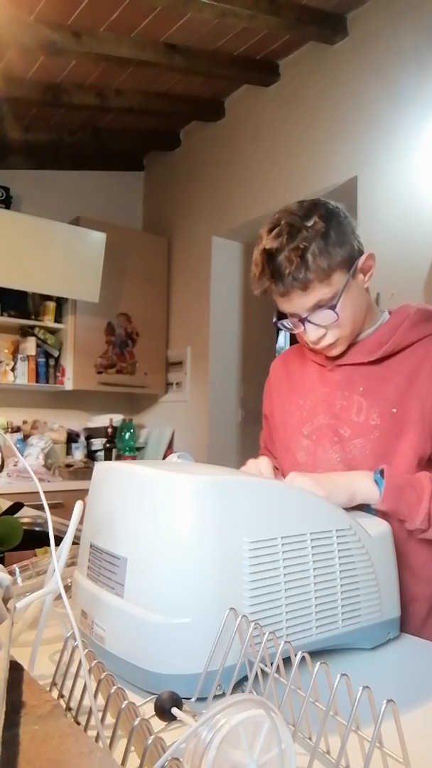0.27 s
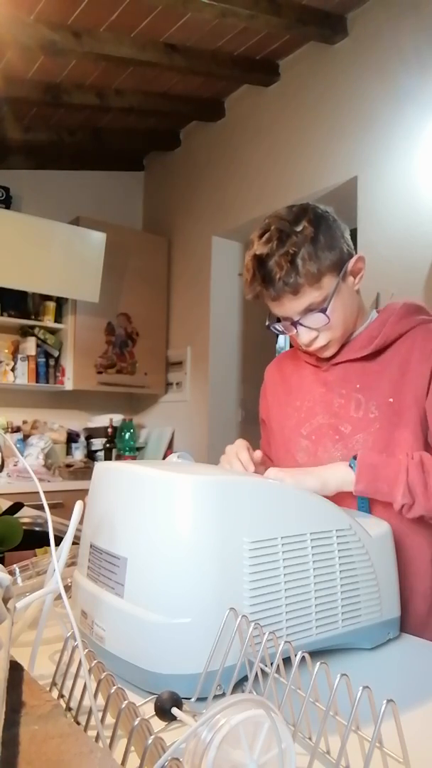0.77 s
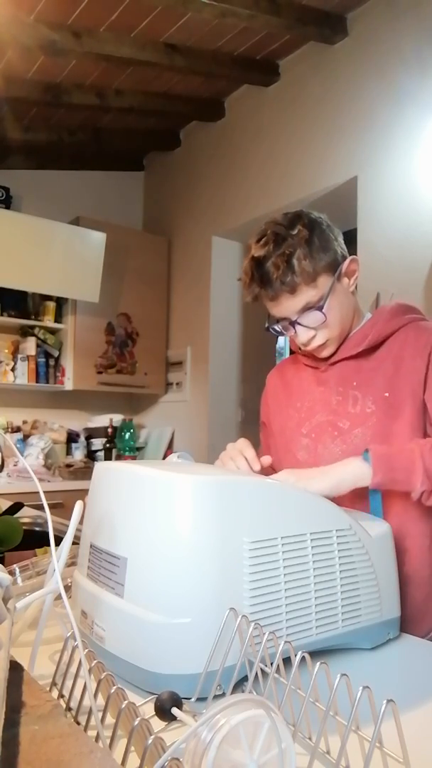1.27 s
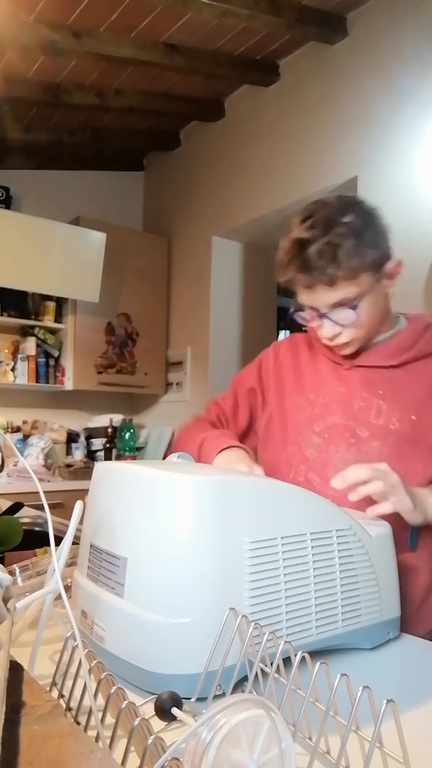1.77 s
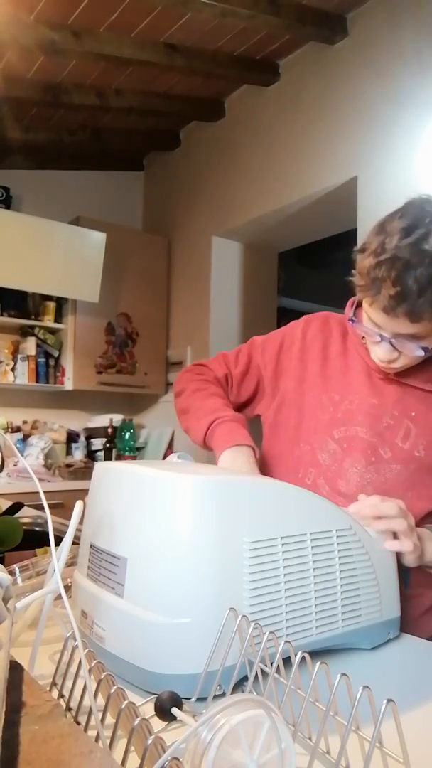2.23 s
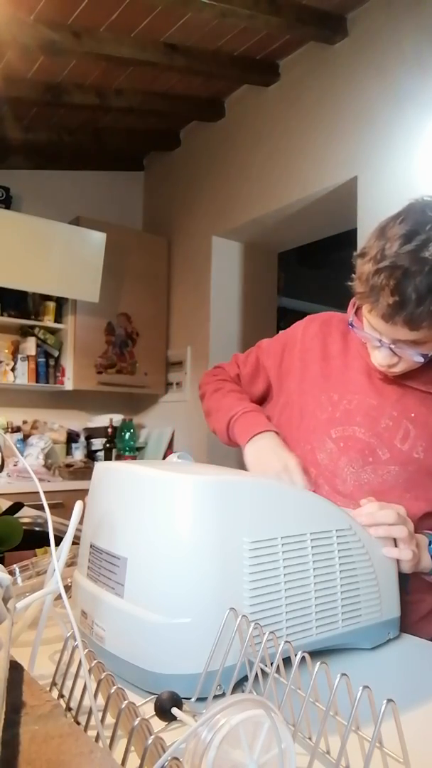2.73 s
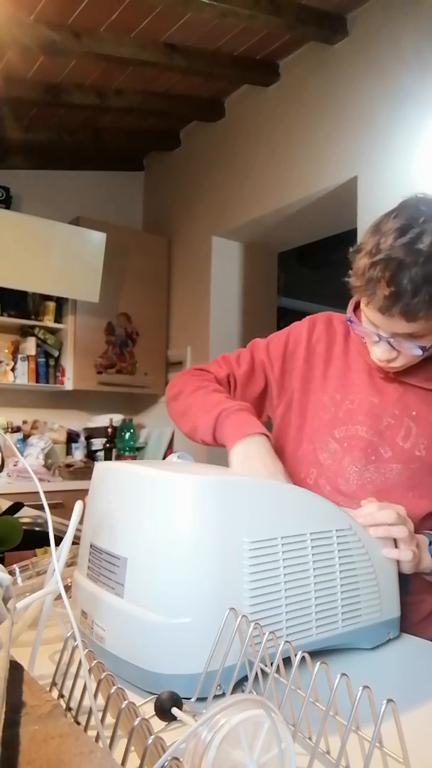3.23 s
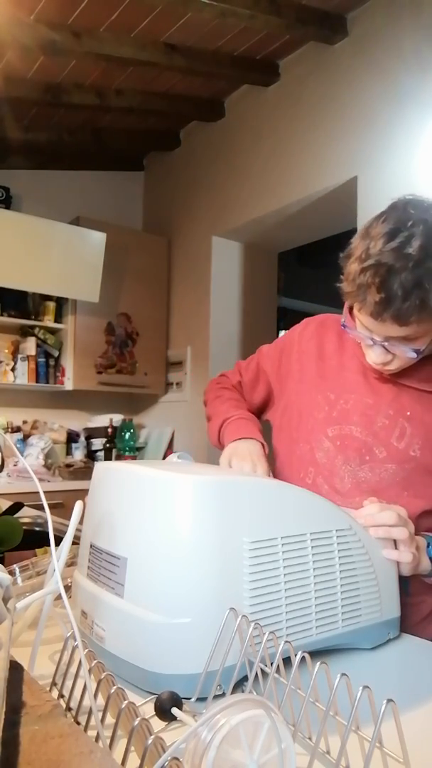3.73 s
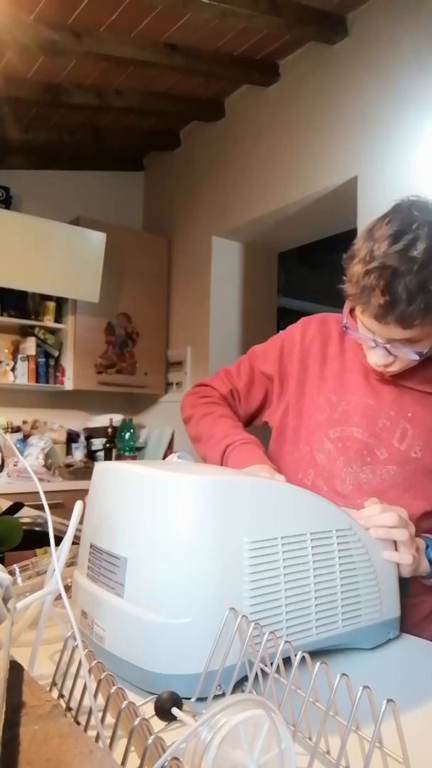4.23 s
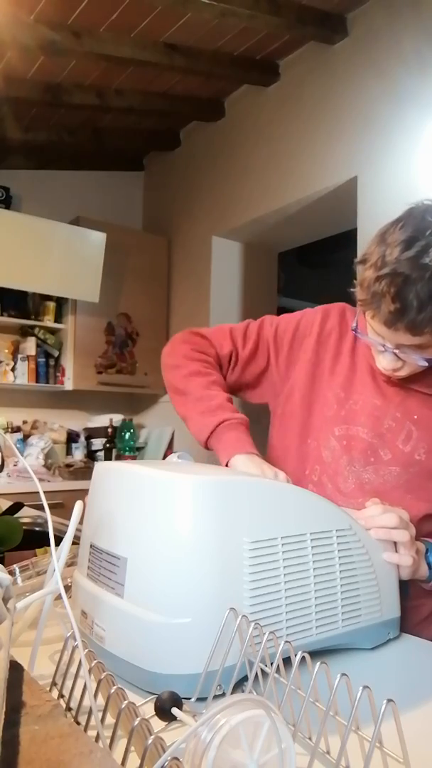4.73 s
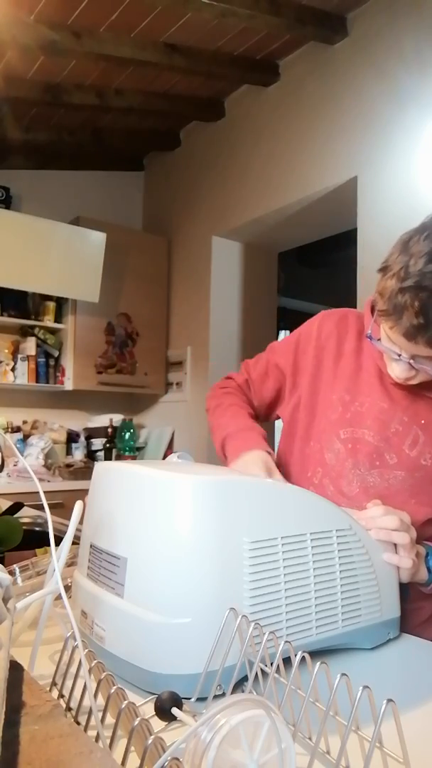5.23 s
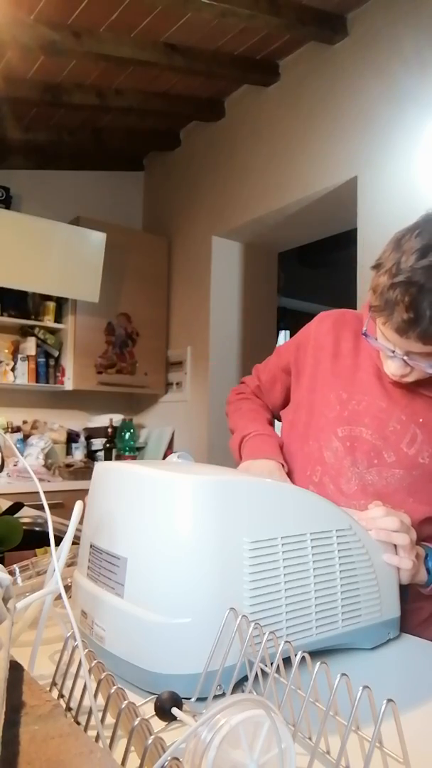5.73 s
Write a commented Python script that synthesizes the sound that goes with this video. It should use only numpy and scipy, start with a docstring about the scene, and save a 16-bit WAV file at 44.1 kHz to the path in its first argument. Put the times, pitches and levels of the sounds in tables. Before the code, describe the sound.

Hard plastic parts are handled on a hollow ice cream machine in a quiet kitchen. A small knock opens the sound, with a light fingertip rub at 0.1 s, then the loudest clack at 0.18 s, hollow and ringing briefly with a low housing thump. Weak ticks follow to 0.6 s, then near quiet until 1.9 s. A tight group of firm knocks falls at 1.95-2.1 s. Fingers rub around 2.5-2.9 s, with single clicks at 2.7 and 3.0 s. From 3.1 to 3.5 s clacks crowd together as a part is pressed home, strongest at 3.3 and 3.46 s. Soft dull taps and faint rumbling shoves come at 4.1-4.45 s, a click at 5.0 s, then a brighter flurry at 5.4-5.75 s with a low shove at the end. Short room reverberation surrounds everything; the low house murmur is very faint, with slight hiss rising after 4 s.

```python
"""Clicks, knocks and rubs of hard plastic: parts are pressed, slid and snapped into an ice cream maker.
The place is a kitchen counter; every blow rings the hollow housing, its walls and the rim of the part.
Fingers and parts rub in between as shaped noise, and shoves make the housing rumble.
The hands work behind the machine, so the treble reaches the microphone mostly by way of the room.
Under it lie the low murmur of the house and a faint hiss that comes up in the last seconds."""
import sys
import numpy as np
from scipy import signal
from scipy.fft import rfft, irfft, next_fast_len
from scipy.io import wavfile
from scipy.ndimage import uniform_filter1d

SR = 44100
rng = np.random.default_rng(int(sys.argv[2]) if len(sys.argv) > 2 else 0)


def master(y):
    """Save y as 16-bit WAV."""
    cut = np.clip(np.atleast_2d(y).T, -1, 1)
    pcm = np.round(cut * 32767)  # scale
    wavfile.write(sys.argv[1], SR, pcm.astype(np.int16))


N = 264467
TIME = np.arange(N) / SR

# Spectrum of the room's murmur: (frequency [Hz], relative density [dB])
MURMUR_SPECTRUM = [(15, -38), (27, -34), (35, -0.5), (49, 3), (61, -30), (88, -2), (120, -9.5), (260, -4.5),
                   (400, -12.5), (700, -20), (1200, -25), (2500, -34.5), (3900, -36.5), (5200, -24),
                   (7000, -32), (8800, -41.5), (15500, -36)]
MURMUR_DB, MURMUR_PAN_DB = -58.5, -2  # pan: left minus right
# Spectrum of the faint hiss: (frequency [Hz], relative level [dB])
HISS_SPECTRUM = [(500, 4), (1500, -7.5), (3000, 4), (4000, -8), (5200, -2.5), (7000, -1.5), (8500, -19.5),
                 (15000, -21)]
# Course of the hiss: (time [s], level [dB])
HISS_LEVEL = [(0, -69.5), (3.7, -66), (3.95, -67.5), (4.5, -61), (5.5, -63.5), (6, -66)]
# Reverberation of the kitchen: (frequency [Hz], level [dB], t60 [s])
KITCHEN = [(121, -2, 0.48), (289, -5.5, 0.36), (900, -2.5, 0.37), (2230, -3, 0.36), (5900, 1, 0.37),
           (13400, -5.5, 0.21)]

# Side on which the hands work, as the microphone hears it: (time [s], left minus right level [dB])
HANDS_SIDE = [(0, -0.5), (.2, -2), (.6, -2), (1.9, -1.5), (3.45, -2), (3.8, 3.5), (6, 3.5)]
HOUSING_PAN_DB = 1  # the housing sounds a little left of the hands

# Spectrum of the rumbling housing: (frequency [Hz], relative level [dB])
RUMBLE_SPECTRUM = [(40, -5), (80, -3), (120, 3.5), (170, -1.5), (260, 1), (400, -11), (650, -16),
                   (1400, -26.5), (2500, -42.5)]
# Shoves that make it rumble: (time of greatest strength [s], length [s], level before rumble trim [dB])
SHOVES = [(0, 0.04, -29.5), (0.167, 0.23, -42.5), (0.846, 0.23, -54), (2.68, 0.44, -53),
          (2.956, 0.16, -52.5), (3.845, .2, -51), (4.168, 0.38, -50), (4.431, 0.36, -47), (4.824, 0.4, -63),
          (5.774, 0.15, -37.5)]
RESTING_DB = -59.5  # before rumble trim, under hands that only hold the machine

# Strokes of fingers and parts over the plastic:
# (start time [s], length [s], level before rub trim [dB], share of light fingertip hiss [0-1])
RUBS = [(0, 0.13, -63, 0.5), (.11, 0.13, -40.5, 0.92), (0.405, 0.1, -56, 0.1), (1.214, 0.35, -59.5, 0.5),
        (1.883, 0.082, -56.5, 0.9), (2.262, 0.1, -54.5, 0.4), (2.535, 0.3, -45.5, 0.68),
        (2.802, 0.16, -43.5, 0.94), (3.2, 0.2, -47, .1), (4.396, 0.07, -50.5, .02),
        (4.95, 0.072, -48.5, 0.75), (5.182, 0.15, -57.5, 0.44)]
RUB_PEAK = 0.62  # share of a stroke spent speeding up
# Spectrum of fingertip hiss: (frequency [Hz], relative level [dB])
FINGERTIPS = [(300, -2.5), (1200, 4), (2800, -19.5), (4000, -10), (6300, -0.5), (9000, -4), (12000, -6.5),
              (15000, 1.5)]
# A contact skids on briefly: level against its edge tick before rub trim, length, share of light hiss 0-1
SKID_DB, SKID_S, SKID_LIGHT = -3, 0.047, 0.36

# Crowded small modes of the plastic: (frequency [Hz], relative level [dB])
PLASTIC = [(70, -13.5), (150, -2), (230, 1), (450, -1.5), (680, -3), (950, 11), (1500, 0), (1900, 0.5),
           (2500, 2), (3300, -7.5), (3900, -10.5), (5200, -7.5), (7100, -5.5), (8400, -16.5),
           (12500, -20.5), (15200, -22)]
# Strong modes of the machine, before scatter and detuning:
# (frequency [Hz], relative level [dB], t60 before joint friction [s])
MODES_OF_MACHINE = [(117, -20.5, .2), (152.2, 0.5, 0.19), (209, -10, 0.19), (246, 5.5, 0.12),
                    (304.3, -2, 0.07), (379.2, 1.5, 0.23), (449, -12, 0.091), (510.2, -2, 0.15),
                    (530, -17.5, 0.15), (660, -13.5, 0.4), (694.4, -8.5, 0.18), (890, 6.5, 0.041),
                    (1000, 1.5, 0.042), (1189, 5, 0.021), (1420, -6.5, 0.14), (1500, -6.5, 0.12),
                    (1572, -2.5, 0.051), (2014, -18, 0.034), (2245, -5.5, 0.11), (2260, -3, 0.17),
                    (2421, -1.5, 0.15), (2880, -15, 0.083), (3270, 2.5, 0.052), (5330, 2, 0.11),
                    (5100, -3, 0.19), (5630, -3.5, 0.057), (5920, 0.5, 0.11), (6900, -6, 0.19),
                    (7040, -2.5, 0.22)]
# Housing, walls, rim, edges:
# (trim [dB], dense ring t60 at usual strength [s], dense ring against modes [dB], build-up [s])
PARTS = [(-0.5, 0.15, 1, 0.0076), (-1.5, 0.029, -1.5, 0.0014), (-0.5, 0.071, 5, 0.0024),
         (-0.5, 0.11, 6, 0.0007)]
# Limits of the ranges of housing, walls, rim and edges: (frequency [Hz])
EDGES_HZ = [70, 620, 1800, 4200, 17000]
# Blows of part on machine, levels before the trims of the parts: (time [s], strength [dB],
# weight behind it [dB re strength], hardness [dB re strength], clack pitch [Hz])
BLOWS = [(0.003, -33, -4, -15, 1500), (0.022, -37, -4, -23, 1910), (0.119, -44.5, 7, -4.5, 3200),
         (0.181, -23, -8, -10.5, 2580), (0.183, -15.5, -5.5, -18, 830), (0.317, -43, 0, -3, 2570),
         (0.489, -40, -0.5, -34, 940), (0.564, -45, -4.5, -21.5, 1840), (0.826, -66.5, 14, -3, 1490),
         (0.944, -53.5, 6.5, -15, 1200), (1.904, -56, 16, -2, 1220), (1.936, -43.5, 0, -27, 1020),
         (1.965, -33, -7, -22, 1210), (1.977, -27.5, -6.5, -3.5, 1280), (2.066, -30.5, -6.5, -15, 1370),
         (2.368, -53, -8, -9, 1210), (2.703, -36, -4.5, -8.5, 1200), (2.989, -32, -12.5, -9, 1200),
         (3.057, -43, 6, -30, 1190), (3.134, -54.5, 4.5, 10, 2500), (3.183, -45.5, -2, -24, 1250),
         (3.248, -46, 1, -34, 1240), (3.296, -26.5, -11, -16.5, 1400), (3.31, -37.5, 3.5, -11, 1430),
         (3.327, -41.5, 3.5, 4, 1200), (3.406, -33.5, -4, -12.5, 1460), (3.433, -38.5, 2, -1, 1530),
         (3.459, -24, -3.5, -14, 1450), (3.743, -46.5, 4.5, -16, 1990), (3.845, -56.5, -14, 11, 1420),
         (4.119, -45.5, -22, -35, 1090), (4.157, -46.5, 6.5, -37, 965), (4.196, -41.5, 0.5, -30, 1900),
         (4.228, -39.5, -3, -21, 1920), (4.367, -47, -11, -16, 980), (4.386, -41.5, -2, -25, 1550),
         (4.429, -45.5, 3, -9, 1450), (4.903, -52.5, -2, -5, 1420), (4.993, -34.5, -3, -18.5, 1410),
         (5.367, -41.5, 0, -20.5, 1490), (5.44, -37.5, -3, -16, 2400), (5.643, -41, -1.5, -25.5, 1710),
         (5.682, -31.5, -6.5, -6, 2560), (5.689, -32, 6, -20, 2430), (5.719, -35.5, -0.5, -1.5, 1500)]
# The housing thuds low, and about an octave higher while the part is being pressed home
THUD_HZ, SEATING_THUD_HZ = 245.4, 515
SEATING_START_S, SEATING_END_S = 3.28, 3.5
# The rim takes a share of the contact's hardness, and rings more when the contact is high in pitch
RIM_DB, RIM_HARD_SHARE, RIM_DB_PER_OCTAVE, USUAL_CLACK_HZ = -7, 0.32, 10.5, 1400
# Friction in the joints stops big swings of housing and walls sooner: extra fade's t60 at this strength
FRICTION_T60_S, FRICTION_AT_DB = 0.2, -13

TOP_HZ = 15900  # upper limit of the phone's microphone


def undb(db):
    """Decibels to gain."""
    return 10 ** (np.asarray(db) / 20)


def unit(x):
    """Scale to rms 1."""
    return x / np.sqrt(np.mean(x ** 2))


def freqs(size):
    """Frequencies [Hz] of the spectrum of size samples, kept above zero for logarithms."""
    return np.maximum(np.arange(size // 2 + 1) * SR / size, 1)


def colour(x, points):
    """Shape a sound by (Hz, dB) points, joined on a logarithmic frequency axis."""
    hz, db = np.transpose(points)
    length = x.shape[-1]
    size = next_fast_len(length, True)
    gain = undb(np.interp(np.log(freqs(size)), np.log(hz), db))
    return irfft(rfft(x, size) * gain, size)[..., :length]


def band(x, lo_hz, hi_hz, order=4):
    """Causal band-pass."""
    limits = [lo_hz, min(hi_hz, SR / 2 - 1000)]
    return signal.sosfilt(signal.butter(order, limits, "band", fs=SR, output="sos"), x)


def diffuse(size, alike_hz=720, bass_alike=0.98):
    """Noise from all sides at two microphone ports: the bass is shared, the treble unrelated."""
    padded = next_fast_len(size, True)
    alike = min(bass_alike, 1) * np.exp(-(freqs(padded) / alike_hz) ** 4)
    noise = rfft(rng.standard_normal((2, padded)))
    mid, side = noise * np.sqrt([1 + alike, 1 - alike])
    return irfft(np.array([mid + side, mid - side]), padded)[:, :size] / np.sqrt(2)


def fade(t, t60):
    """Exponential decay, 60 dB down after t60."""
    return np.exp(-np.log(1000) * t / t60)


def lean(pan_db):
    """Left and right gains for a level difference."""
    return undb(np.array([[1], [-1]]) * pan_db / 2)


def hands_db(s):
    """Left minus right level of the place where the hands work."""
    return np.interp(s, *np.transpose(HANDS_SIDE))


def stroke(start, length, peak):
    """Speed of one movement, 0-1: it gathers for the share peak of its length, then comes to rest."""
    turn = start + length * np.clip(peak, .01, .99)
    ramp = np.interp(TIME, [start, turn, start + length], [0, 1, 0])
    return np.sin(np.pi / 2 * ramp)


def room_tone():
    """Low murmur of the house under a smooth hiss, both steady noise shaped in spectrum."""
    murmur = unit(colour(diffuse(N), MURMUR_SPECTRUM)) * undb(MURMUR_DB) * lean(MURMUR_PAN_DB)
    hiss = unit(colour(diffuse(N), HISS_SPECTRUM))
    return murmur + hiss * undb(np.interp(TIME, *np.transpose(HISS_LEVEL)))


def kitchen(dry, first_echo_s=0.0105, build_s=0.00033):
    """Counter, walls and ceiling return a dense tail that is shortest in the high treble."""
    t = TIME[:SR]
    hz, wet_db, t60 = np.transpose(KITCHEN)
    spectrum = rfft(diffuse(len(t)))
    log_bins = np.log(freqs(len(t)))
    onset = 1 - np.exp(-np.maximum(t - first_echo_s, 0) / build_s)
    tail = 0
    # each row of the identity matrix fades one table band into its neighbours
    for share, db, decay in zip(np.eye(len(hz)), wet_db, t60):
        shape = onset * fade(t, decay)
        noise = irfft(spectrum * np.interp(log_bins, np.log(hz), share), len(t))
        tail = tail + undb(db) * noise * shape / np.sqrt(np.sum(shape ** 2))
    return signal.fftconvolve(dry, tail, axes=1)[:, :N]


def rumble(trim_db=-3, swell=2.9):
    """Resting hands shake the hollow housing a little, each shove more."""
    effort = undb(RESTING_DB)
    for s, length, db in SHOVES:
        effort = effort + undb(db) * stroke(s - 0.5 * length, length, 0.42) ** swell
    # the stroke peaks slightly before its middle
    shaking = unit(colour(diffuse(N), RUMBLE_SPECTRUM))
    return shaking * effort * undb(trim_db) * lean(hands_db(TIME) + HOUSING_PAN_DB)


def rubs(grain_db=3.5, trim_db=-5, swell=1.01, rasp_hz=4700, edge_width_hz=170, edge_db=-4, skid_peak=0.073):
    """Surfaces catch and slip in tiny steps: plastic rasps, fingertips hiss."""
    steps = TIME[::100]
    grip = undb(grain_db * np.interp(TIME, steps, rng.standard_normal(len(steps))))
    catches = diffuse(N) * grip
    # the sliding edge sings in its own modes, damped by the contact
    edge = 0
    for hz, db, _ in MODES_OF_MACHINE:
        if hz > EDGES_HZ[-2]:
            edge = edge + undb(db) * band(catches, hz - edge_width_hz / 2, hz + edge_width_hz / 2, order=1)
    scrape = unit(band(colour(catches, PLASTIC), rasp_hz, TOP_HZ, order=1))
    rasp = unit(scrape + undb(edge_db) * unit(edge))
    hiss = unit(colour(diffuse(N) * grip, FINGERTIPS))
    slides = [(*row, RUB_PEAK) for row in RUBS]
    skids = [(s, SKID_S, db + hard_db + SKID_DB, SKID_LIGHT, skid_peak)
             for s, db, _, hard_db, _ in BLOWS]
    rasp_power, hiss_power = 0, 0
    for start, length, db, light, peak in slides + skids:
        power = (undb(db + trim_db) * stroke(start, length, peak) ** swell) ** 2
        light = np.clip(light, 0, 1)
        rasp_power = rasp_power + (1 - light) * power
        hiss_power = hiss_power + light * power
    return lean(hands_db(TIME)) * (np.sqrt(rasp_power) * rasp + np.sqrt(hiss_power) * hiss)


def blow(levels_db, spots_hz, pans_db, spot_db=7, spot_width=0.2, scatter_db=2.5, detune=0.00666,
         port_spread=1.04, chatter=0.068, usual_db=-38):
    """One contact rings strong modes and a crowd of small ones; one stereo sound for each part."""
    t = TIME[:SR // 4]
    hz, db, t60 = np.transpose(MODES_OF_MACHINE)
    bins = freqs(len(t))
    chance = rng.standard_normal((3, len(hz)))
    # the struck spot favours the modes near its thud and clack pitches, and the grip detunes them
    nearness = sum(np.exp(-(np.log(bins / spot) / spot_width) ** 2) for spot in spots_hz)
    favour = undb(spot_db * nearness)
    size = undb(db + scatter_db * chance[0]) * np.interp(hz, bins, favour)
    tuned_hz = hz * (1 + detune * chance[1])
    waves = np.exp(2j * np.pi * tuned_hz[:, None] * t) * fade(t, t60[:, None])
    # short waves reach the two microphone ports out of step
    skew = port_spread * np.minimum(hz / 800, 2) ** 2 * chance[2]
    weights = size * np.exp(1j * np.array([skew, -skew]) / 2)
    crowd = rfft(colour(diffuse(len(t)), PLASTIC)) * favour
    out = []
    for lo_hz, hi_hz, part, level_db, pan_db in zip(EDGES_HZ, EDGES_HZ[1:], PARTS, levels_db, pans_db):
        trim_db, ring_t60, crowd_db, rise_s = part
        own = (hz >= lo_hz) & (hz < hi_hz)
        modes = (weights[:, own] @ waves[own]).imag
        # the harder the blow, the longer loose parts chatter against each other
        clatter = fade(t, ring_t60 * undb(chatter * (level_db - usual_db)))
        dense = irfft(crowd * ((bins >= lo_hz) & (bins < hi_hz)), len(t)) * clatter
        build_up = 1 - np.exp(-t / rise_s)
        ring = lean(pan_db) * (unit(modes) + undb(crowd_db) * unit(dense)) * build_up
        # a level is that of the loudest few milliseconds
        peak = np.sqrt(uniform_filter1d(np.mean(ring ** 2, axis=0), size=256).max())
        out.append(undb(level_db + trim_db) * ring / peak)
    return np.array(out)


def knocks():
    """All the clicks and knocks: weight brings out the housing, hardness the rim and edges."""
    parts = np.zeros((len(PARTS), 2, N + SR))
    for s, db, weight_db, hard_db, clack_hz in BLOWS:
        octaves = np.clip(np.log2(clack_hz / USUAL_CLACK_HZ), -.3, 1)
        rim_db = RIM_DB + RIM_HARD_SHARE * hard_db + RIM_DB_PER_OCTAVE * octaves
        thud_hz = SEATING_THUD_HZ if SEATING_START_S < s < SEATING_END_S else THUD_HZ
        levels_db = db + np.array([weight_db, 0, rim_db, hard_db])
        pans_db = hands_db(s) + np.array([HOUSING_PAN_DB, 0, 0, 0])
        sound = blow(levels_db, [thud_hz, clack_hz], pans_db)
        size = sound.shape[-1]
        sound[:2] *= fade(TIME[:size], FRICTION_T60_S * undb(FRICTION_AT_DB - db))
        start = max(int(s * SR), 0)
        parts[..., start:start + size] += sound
    # each part radiates only in and near its own range
    return sum(band(x[:, :N], lo / np.sqrt(2), hi * np.sqrt(2), order=2)
               for x, lo, hi in zip(parts, EDGES_HZ, EDGES_HZ[1:]))


def scene():
    """The handling, its reverberation and the quiet room."""
    handling = knocks() + rubs() + rumble()
    return handling + kitchen(handling) + room_tone()


def record(dry):
    """The phone's microphone cuts the top: a steep low-pass."""
    return signal.sosfilt(signal.ellip(10, .2, 80, TOP_HZ, fs=SR, output="sos"), dry)


dry = scene()
out = record(dry)
master(out)
```